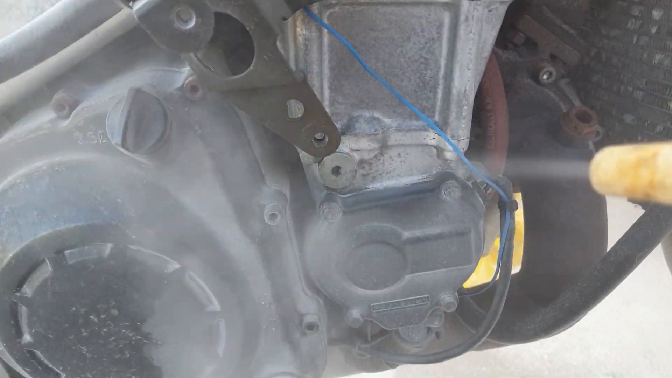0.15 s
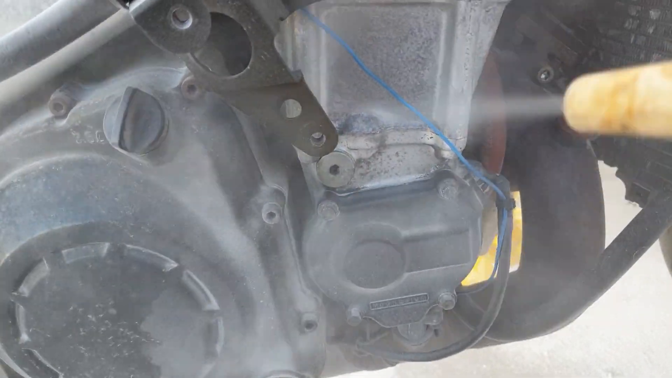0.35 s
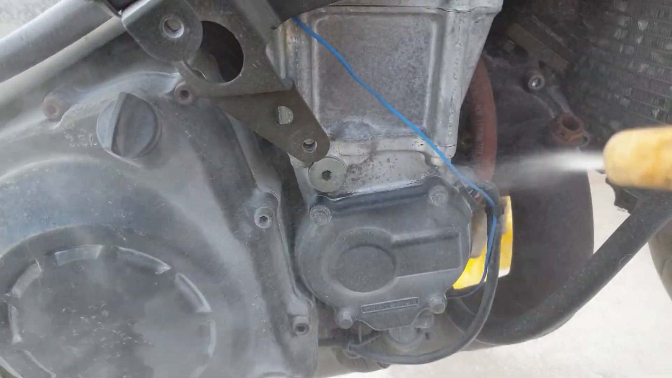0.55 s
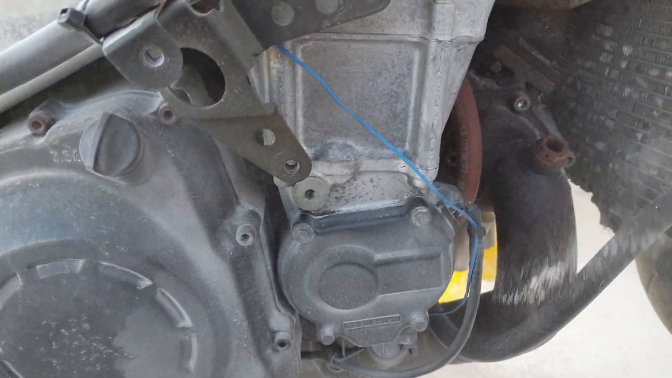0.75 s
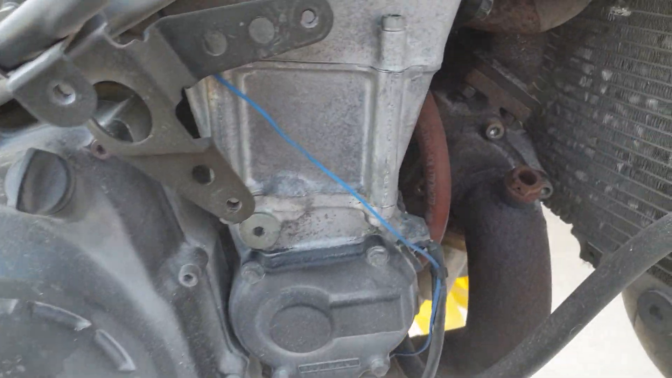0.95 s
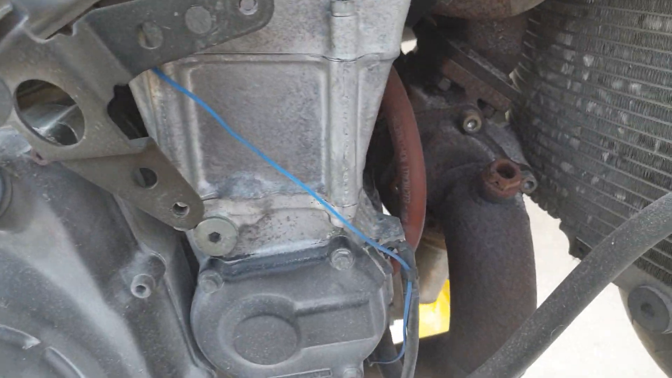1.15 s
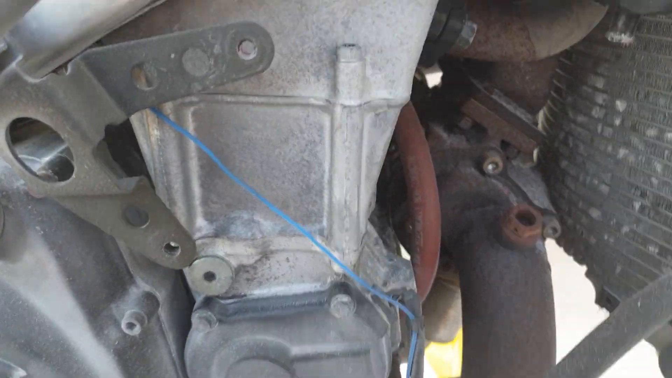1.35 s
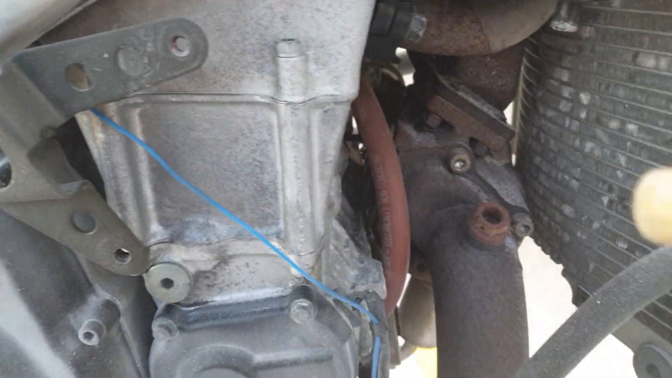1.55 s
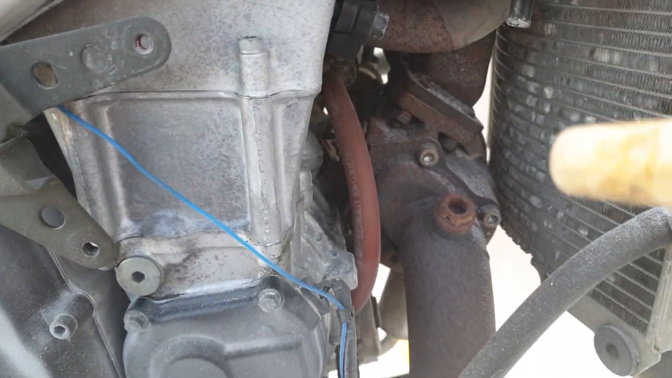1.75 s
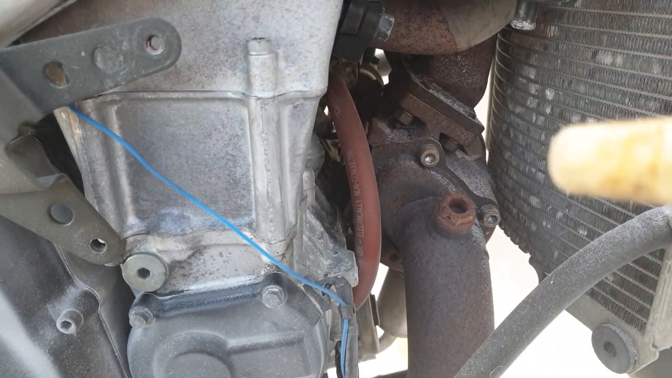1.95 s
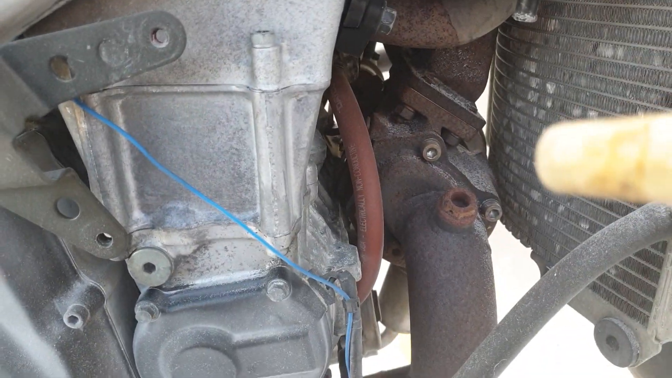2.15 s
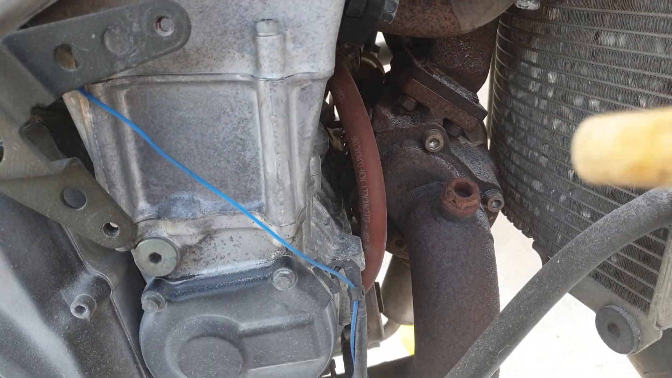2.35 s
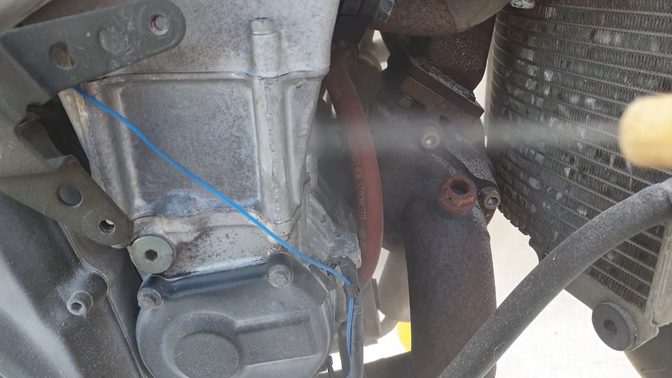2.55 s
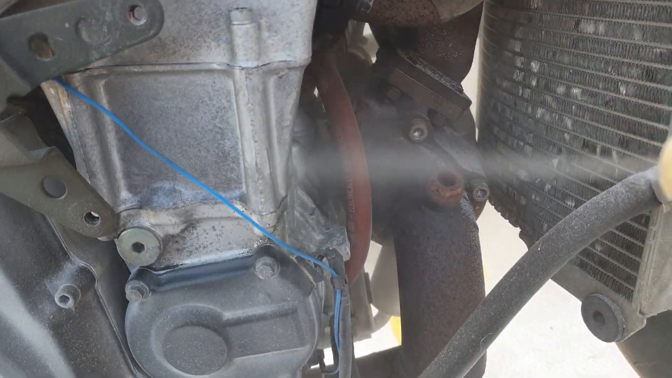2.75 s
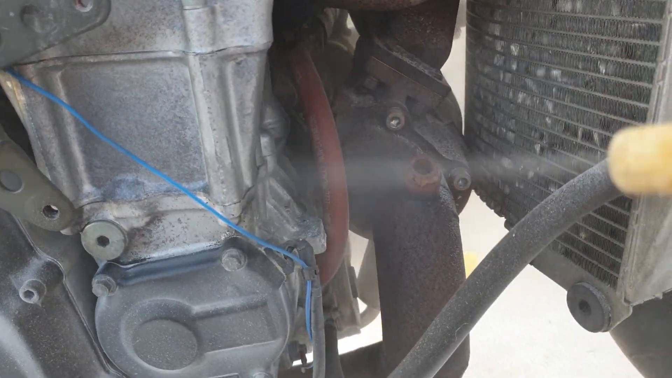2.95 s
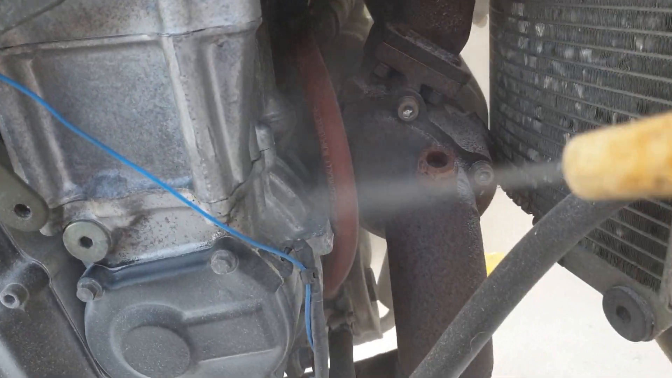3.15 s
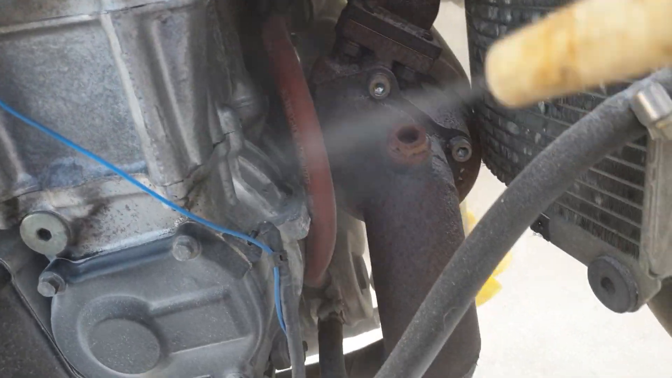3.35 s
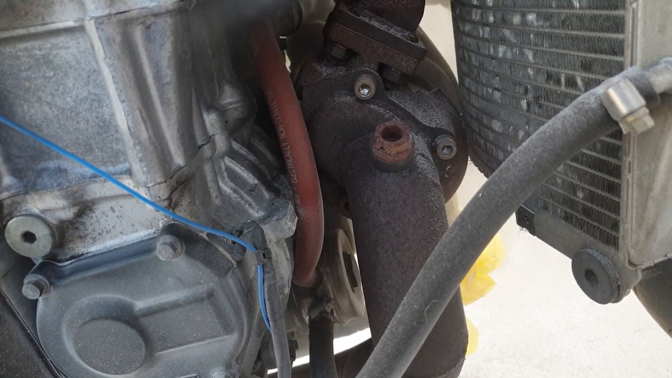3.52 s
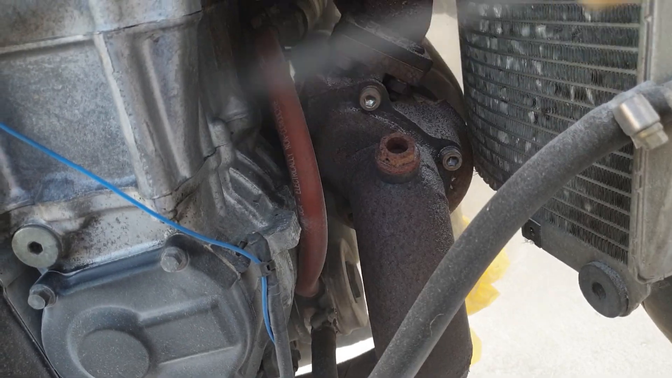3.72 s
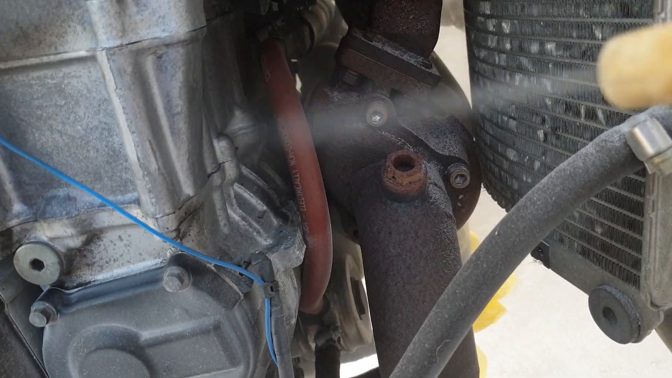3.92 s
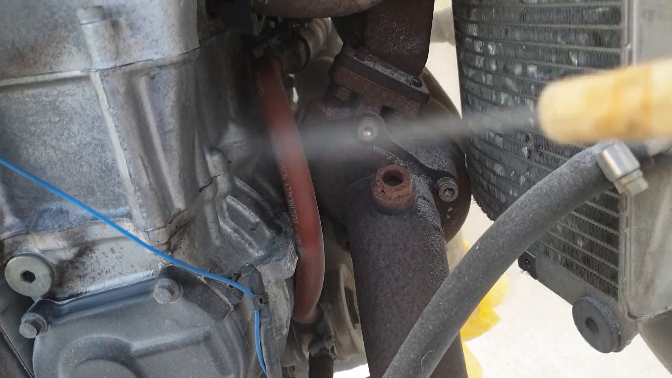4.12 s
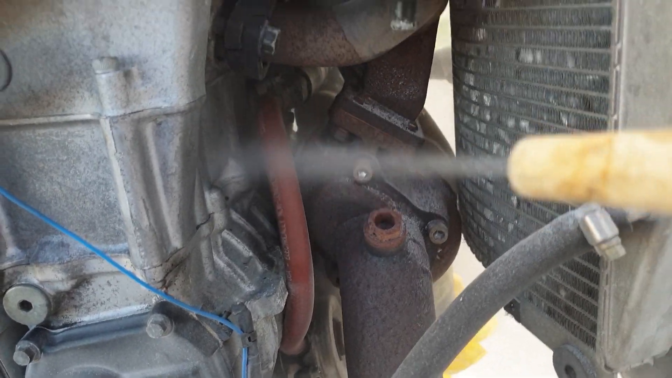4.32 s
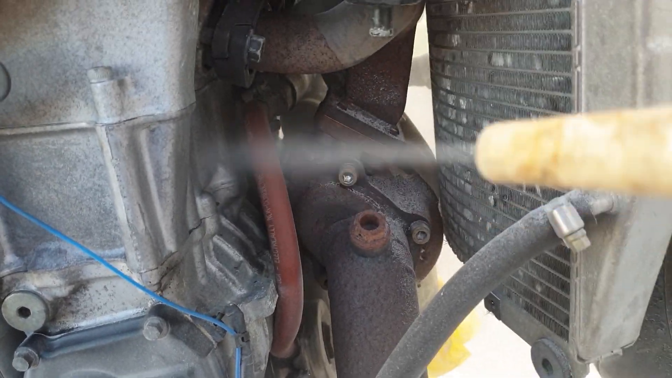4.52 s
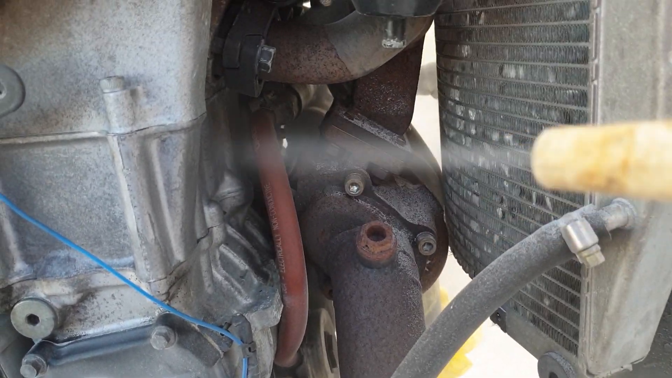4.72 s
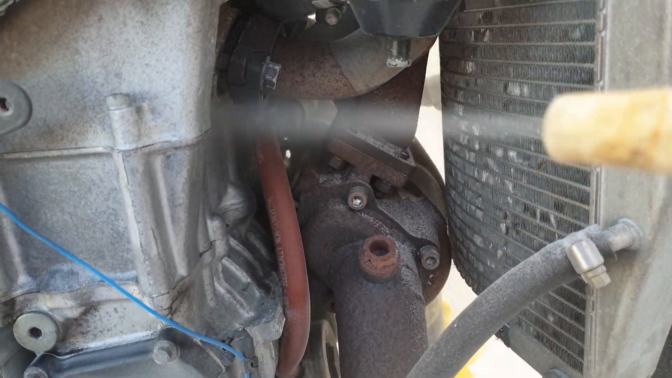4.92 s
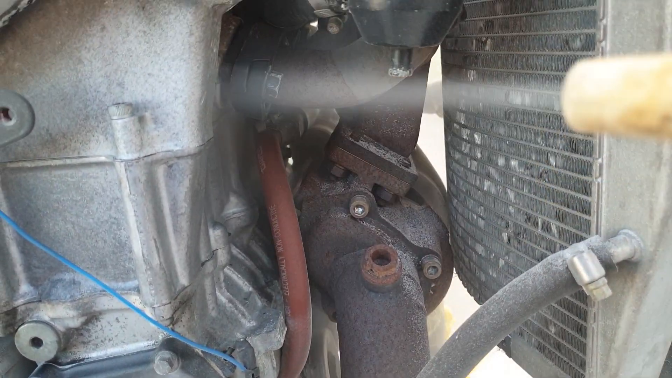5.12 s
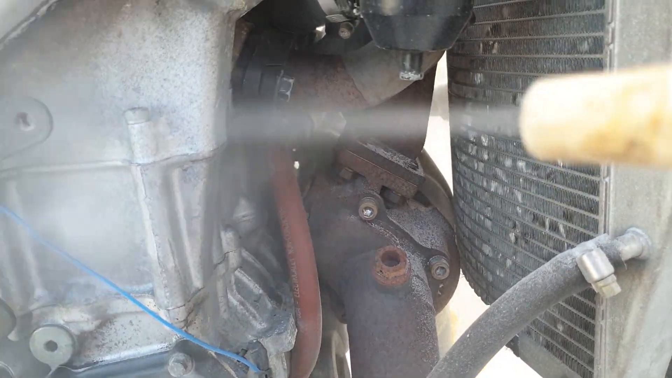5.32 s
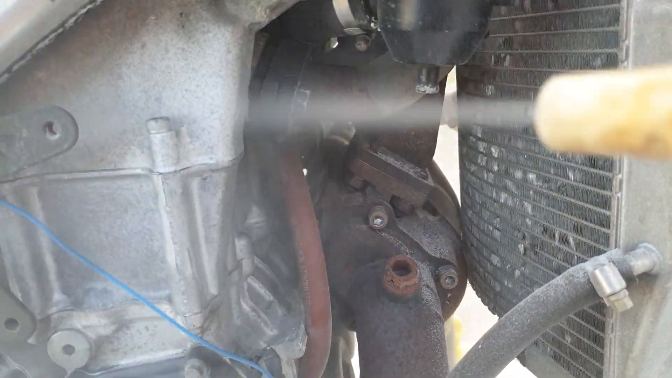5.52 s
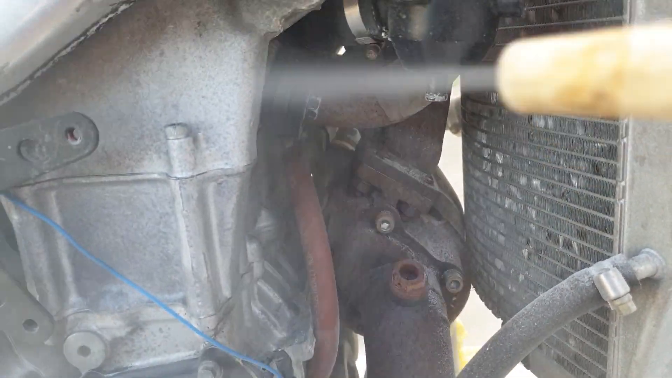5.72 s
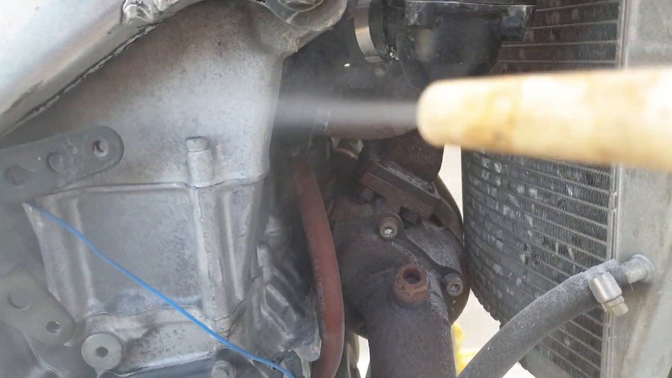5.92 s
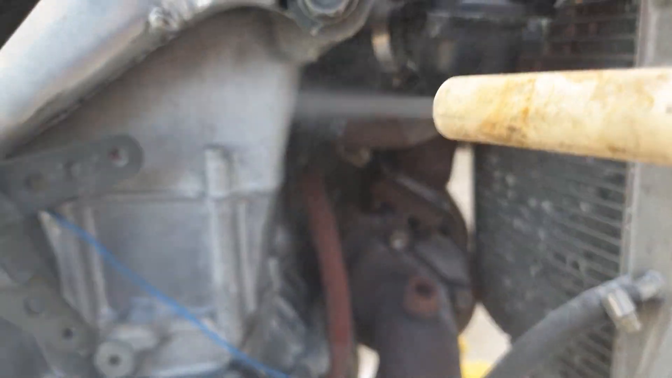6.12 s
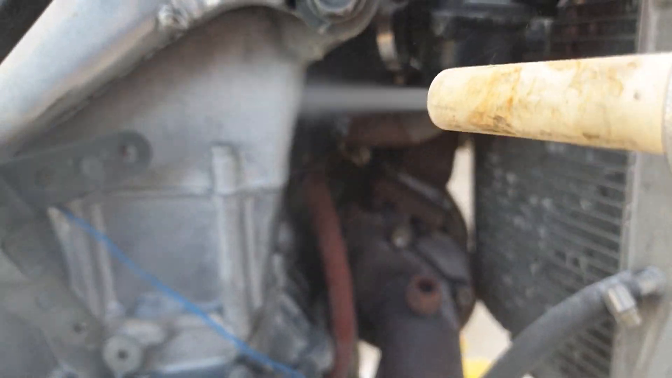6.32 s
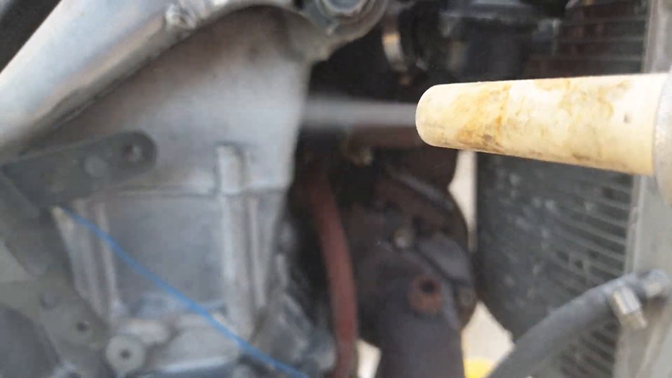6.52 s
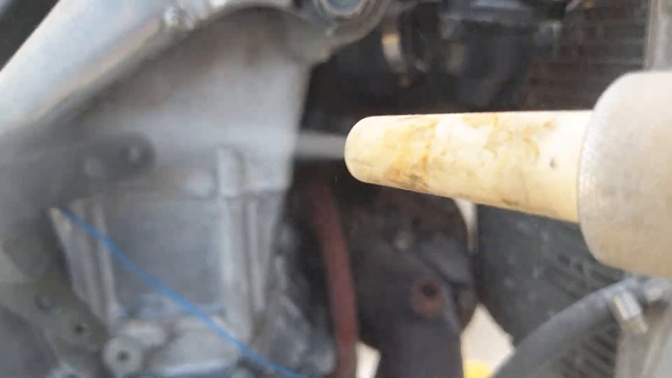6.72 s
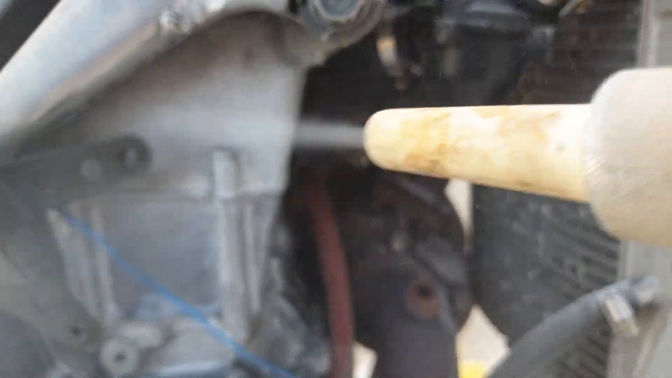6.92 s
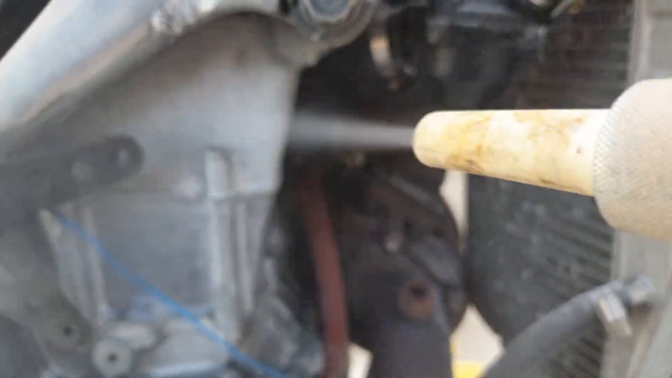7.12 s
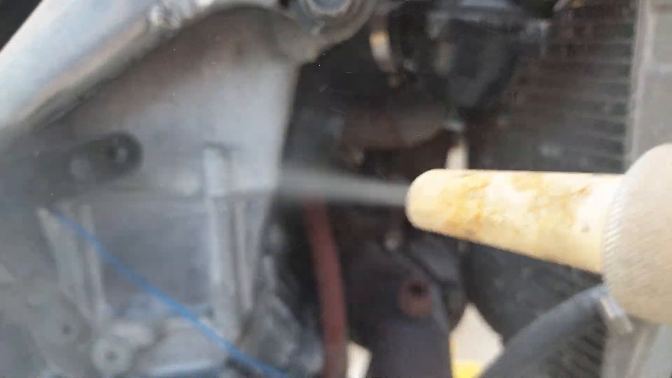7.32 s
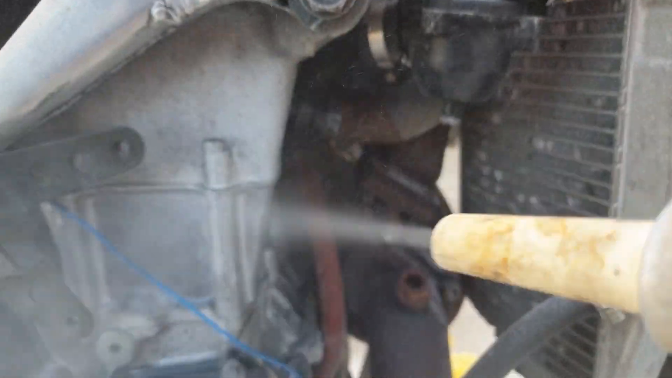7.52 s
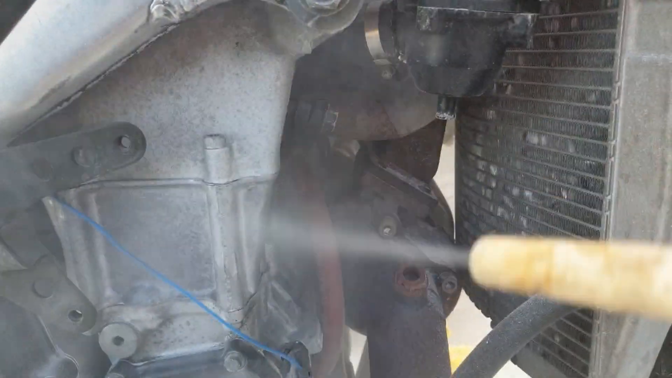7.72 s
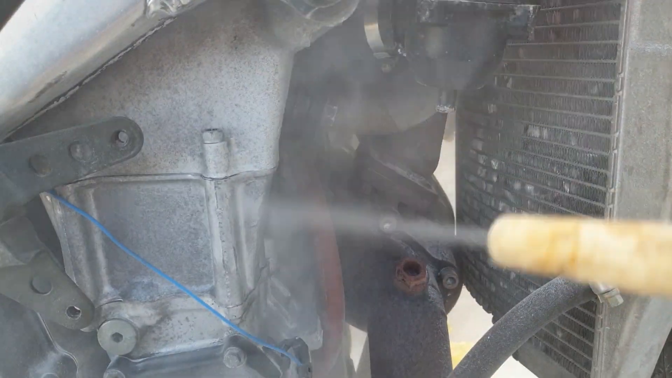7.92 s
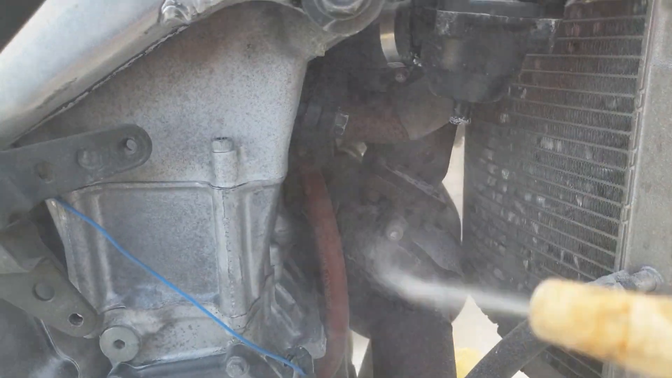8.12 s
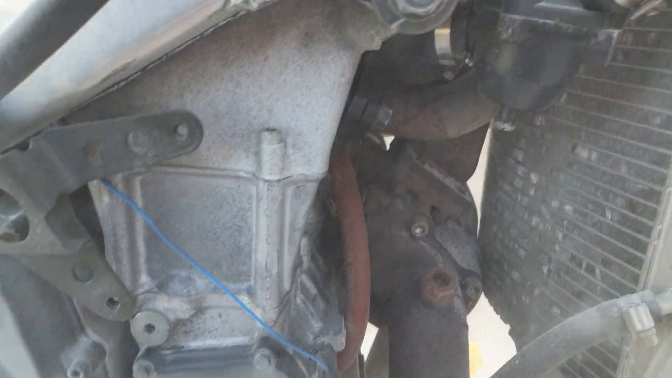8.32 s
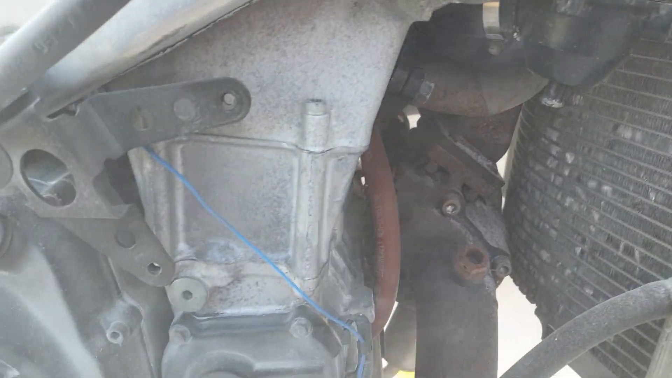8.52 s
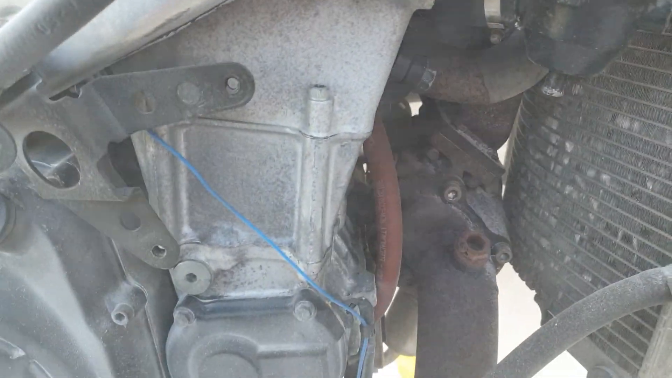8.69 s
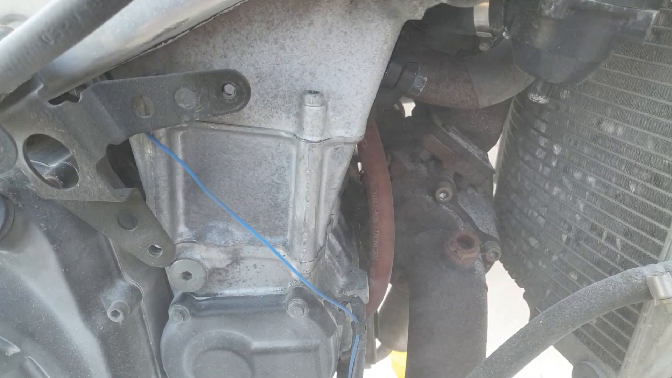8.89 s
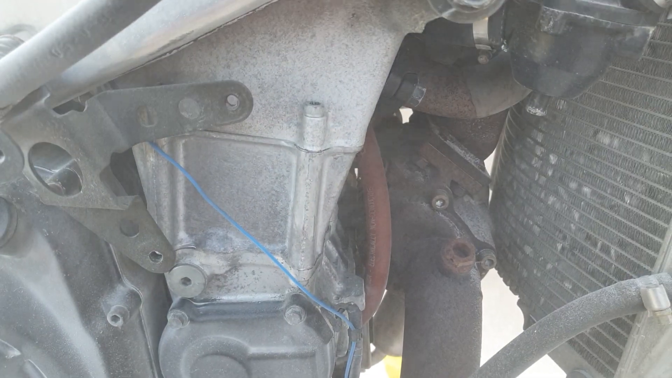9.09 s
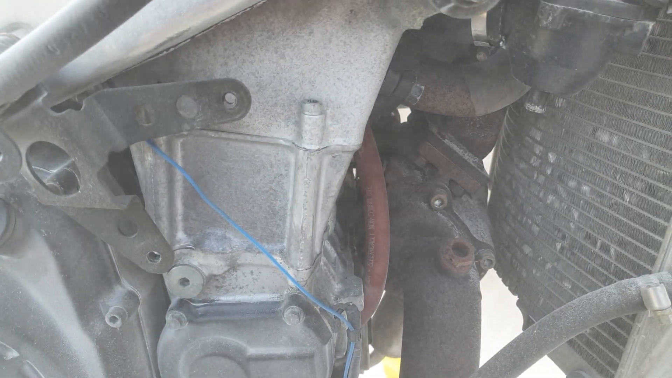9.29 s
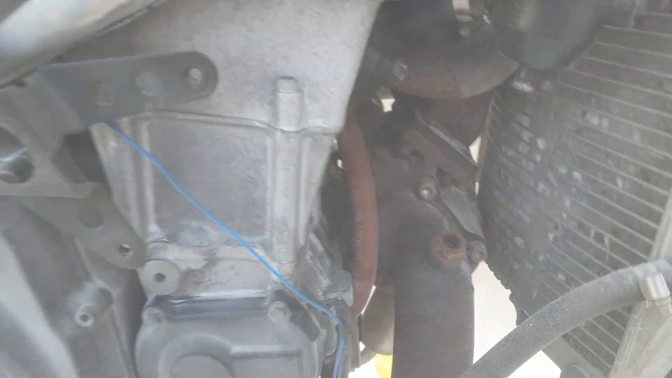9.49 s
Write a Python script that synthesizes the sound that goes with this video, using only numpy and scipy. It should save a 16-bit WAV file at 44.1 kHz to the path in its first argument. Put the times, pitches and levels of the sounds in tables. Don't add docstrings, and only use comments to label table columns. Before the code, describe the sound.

Close stereo microphone, dry open yard. A bright hissing stream of air and powder strikes metal and stops dead. Quiet follows, with a low distant rumble slowly rising. The jet bursts back with a low push and an initial surge, then runs continuously, its tone shifting between airy hiss, coarse rasp and hollow roar as it crosses castings. It snaps off, a little air seeps out, and a far air machine whirs up over the rumble.

```python
import sys
import numpy as np
from scipy import signal
from scipy.io import wavfile
from scipy.ndimage import uniform_filter1d

SR = 44100
rng = np.random.default_rng(int(sys.argv[2]) if len(sys.argv) > 2 else 0)


def level_to_linear(level):
    exponent = np.asarray(level, float) / 20
    return 10 ** exponent


def bounce(signal):
    frames = np.transpose(np.atleast_2d(signal))
    limited = np.clip(frames, -1, 1)
    pcm = np.round(limited * 32767).astype(np.int16)
    wavfile.write(sys.argv[1], SR, pcm)


N = 421155

SIZE, HOP = 512, 128
HZ = np.fft.rfftfreq(SIZE, 1 / SR)[:, None]
FINE_HZ = np.fft.rfftfreq(4 * SIZE, 1 / SR)[:, None]
T = np.arange(N // HOP + 6) * HOP / SR

# low_hz, high_hz
JET_BANDS = [(300, 1300), (1500, 4000), (4800, 7600), (9000, 15500)]
# roar_db, rasp_db, ring_db, hiss_db
JET_LEVELS = [(-37.5, -35.5, -32, -22.5), (-33, -36.5, -33, -21.5), (-39.5, -37.5, -32, -23),
              (-37.5, -34, -29, -21), (-34, -33.5, -32.5, -21.5)]
# roar_db, rasp_db, ring_db, hiss_db
SURGE = (6.8, 4.8, 6.8, 6.1)
SURGE_S = 0.18
# roar_db, rasp_db, ring_db, hiss_db
HAND_SHAKE = (1.2, 0.9, 0.51, 0.65)
# time_s, position_number
SWEEP = [(.6, 0), (2.5, 1), (3.2, 1.6), (3.6, 2), (5.1, 2), (5.7, 3), (7.2, 3), (7.7, 4)]
# freq_hz, density_db (per Hz)
JET_COLOUR = [
    [(200, -20), (564, -10), (742, -12.5), (827, -10), (1740, -9), (2960, -16), (4000, -14), (5590, -11.5),
     (7220, -5), (11400, -0.5), (15500, -2)],
    [(200, -24.5), (430, -7), (665, -11.5), (874, -1), (1050, -10), (1840, -5), (4330, -15), (6130, -7),
     (8350, -11.5), (15000, -3.5)],
    [(200, -12), (358, -14.5), (497, -6.5), (653, -11), (974, -9), (4100, -12.5), (6960, -5.5), (8500, -8),
     (10800, -2), (12700, -4.5), (15500, 1)],
    [(200, -9.5), (446, -4), (858, -8), (1710, -10.5), (3070, -17.5), (5010, -8.5), (6020, -1.5),
     (8200, -10.5), (13200, -8.5), (15500, -4.5)],
    [(200, -11.5), (352, -15.5), (454, -7), (812, -4), (1280, -8), (1650, -5), (2960, -9.5), (4410, -10.5),
     (6470, -5), (7900, -8.5), (10800, -5), (15500, 0)],
]
# freq_hz, left_minus_right_db
JET_LEAN = [
    [(60, -13), (99, -15), (160, -15), (270, -11.5), (450, -7.5), (740, -1), (1220, -1), (2010, 0.5),
     (3330, -2.5), (5500, 4), (9080, -12.5), (15000, -1.5)],
    [(60, -11), (99, -3.5), (160, 1), (270, 0.5), (450, -1), (740, -2.5), (1220, 3.5), (2010, 2),
     (3330, -5), (5500, 2), (9080, -3.5), (15000, 1.0)],
    [(60, 7.5), (99, -0.5), (160, 13), (270, 3), (450, -1.5), (740, -1), (1220, 1), (2010, 2.5),
     (3330, -6.5), (5500, 4), (9080, -7), (15000, -3)],
    [(60, 4), (99, 5), (160, -4.5), (270, 1), (450, -1), (740, 2.5), (1220, 2), (2010, 7), (3330, -4.5),
     (5500, 11.5), (9080, -3.5), (15000, 2)],
    [(60, 0), (99, -3.5), (160, 7), (270, 2), (450, 1.5), (740, 0.5), (1220, 3.5), (2010, 5.5), (3330, -3),
     (5500, 4), (9080, -4.5), (15000, 3.5)],
]
# freq_hz, left_lead_rad
PORT_LEAD = [
    [(800, -.1), (2800, -2.8), (5000, -2.9), (8600, -5.1), (15000, -8.8)],
    [(900, .2), (2000, -.8), (2800, -3.1), (7000, -3.6), (15000, -7.3)],
    [(900, .1), (2000, -.7), (2800, -3.2), (5000, -5.6), (6500, -4)],
    [(400, .2), (1200, 1.1), (2800, .8), (4000, -1.1), (9000, -2.2)],
    [(400, .1), (1500, .9), (2300, -.1), (3300, -1), (6000, -2.4)],
]
# freq_hz, cut_db
JET_BASS = [(120, -35.5), (200, -3)]
# start_s, end_s, low_hz, high_hz, lift_db (negative dips)
POCKETS = [(0.063, 0.14, 1400, 2600, 7.5), (0.056, .17, 3500, 17000, 2.5), (-.1, .3, 3600, 5000, 5),
           (3.196, 3.5, 1300, 3500, 4), (3.24, 3.42, 450, 1000, 3), (3.248, 3.5, 5000, 8000, 2.5),
           (4.6, 5.08, 1190, 4500, -2), (3.51, 3.797, 450, 1110, 3), (5.264, 5.7, 350, 1390, 4.5),
           (5.323, 5.44, 420, 1250, 5), (5.306, 5.597, 1520, 1990, 12), (5.7, 6.05, 10000, 15000, 0),
           (5.902, 6.65, 5600, 6400, 2), (7.251, 7.6, 7000, 10500, 1.5), (6.307, 6.373, 1610, 3500, 3),
           (6.51, 6.583, 1600, 3200, 6), (6.69, 6.873, 1490, 3800, 8), (6.7, 6.87, 2300, 3200, 4),
           (7.045, 7.16, 1520, 2980, 10), (7.467, 7.533, 400, 2200, 4), (7.618, 7.78, 1410, 1900, 8),
           (7.67, 7.914, 400, 1200, 4), (8.031, 8.11, 700, 2500, 3.5), (.2, .4, 5200, 6500, -2),
           (.4, .55, 7500, 9200, 1.5), (.18, .4, 8000, 9500, -2), (2.85, 3.1, 4200, 5600, -2),
           (3.3, 3.6, 8200, 9600, 3), (3.75, 4.3, 7200, 8600, 2), (4.55, 5.15, 5500, 6600, -3),
           (5.35, 6.0, 4300, 5700, -2.5), (5.5, 5.85, 7000, 8000, 2), (5.85, 6.1, 11000, 12500, 2.5),
           (6.5, 6.9, 12500, 13800, 1.5), (7.03, 7.15, 10500, 13500, 2), (6.3, 7.3, 4300, 5300, 1.5),
           (7.6, 8.2, 5000, 7000, 2), (7.5, 7.95, 9500, 11000, 2), (7.6, 8.2, 12000, 14000, -2),
           (5.8, 6.1, 850, 1350, -2)]
# center_hz, width_hz, change_db
HOUSING = [(3010, 80, -4), (4430, 80, -6), (8300, 200, -3)]
# center_hz, width_hz, lean_db
PORT_SHADOW = [(3900, 800, -5.5), (8200, 900, -6.5), (1900, 500, 1.5)]
# freq_hz, likeness (0-1)
JET_ALIKE = [(200, .62), (500, .85), (1200, .68), (2000, .5), (4000, .56), (8000, .56), (16000, .48)]
# freq_hz, drift_rad
PORT_WANDER = [(600, .1), (1500, .5), (3000, 1.), (16000, 1.5)]

# open_s, shut_s, bleed_db_per_s, leak_db, leak_fade_db_per_s, leak_length_s
TRIGGER = [
    (-.1, 0.582, 2900, -65.5, 108, 0.18),
    (2.578, 8.149, 2900, -64.5, 75, .18),
]
# freq_hz, density_db (per Hz)
LEAK_COLOUR = [(300, -12), (1000, -1), (3000, -3), (6500, -1.5), (11000, -2.5), (16000, -6)]
# level_db, pitch_hz, t60_s
THUMP = (-26.5, 92, 0.07)
THUMP_S = 2.576

BUFFET_DB = -55
# freq_hz, density_db (per Hz)
BUFFET_COLOUR = [(20, -40.5), (35, -17.5), (60, -2), (260, -4), (340, -28), (570, -120)]
# freq_hz, likeness (0-1)
BUFFET_ALIKE = [(30, .35), (100, .5), (250, .6)]
# center_s, half_length_s, lift_db
GUSTS = [(.05, .05, 7.5), (4.88, .04, 9), (5.8, 0.22, 8.5), (5.92, .05, 2), (7.3, .05, 3), (7.5, .05, 4.5),
         (8.13, .05, 2)]

# freq_hz, t60_s
ECHO_DECAY = [(200, .1), (1000, 0.11), (4000, 0.11), (16000, 0.125)]
# freq_hz, level_db
ECHO_COLOUR = [(500, -21), (3000, -15), (12000, -21)]

# time_s, swell (0 low, 1 full)
YARD_SWELL = [(1.1, 0.01), (1.55, 0), (1.8, 0.22), (2.0, 0.63), (2.3, 0.97), (8.2, 0.9), (8.41, 0.82),
              (8.49, 0.99), (9.3, 1), (9.55, 1.1)]
# rumble_db, wash_db, hiss_db
YARD_LOW = (-70.5, -83, -101)
# rumble_db, wash_db, hiss_db
YARD_FULL = (-57, -69.5, -90.5)
# freq_hz, density_db (per Hz)
RUMBLE_COLOUR = [(12, -52), (20, -23.5), (40, -8.5), (75, 3.5), (113, -4.5), (144, -5), (268, -23),
                 (300, -16), (390, -46), (660, -120)]
# freq_hz, density_db (per Hz)
WASH_COLOUR = [(120, -31), (200, -5.5), (269, -9), (308, -9), (347, -14.5), (549, -12), (637, -13.5),
               (1060, -15), (1270, -24.5), (1470, -24), (2230, -29), (2960, -44), (5000, -50.5),
               (6500, -84.5), (11000, -120)]
# freq_hz, density_db (per Hz)
HISS_COLOUR = [(2500, -25), (4500, -17), (6250, -12), (7900, -18), (8800, -12), (11200, -14.5),
               (15500, -14.5)]
# level_db, fade_db_per_s
DREGS = (-80.5, 60)
# pitch_hz, level_db
MOTOR_HUM = [(86, -73), (146, -72)]
# freq_hz, likeness
YARD_ALIKE = [(60, .75), (250, .85), (520, .5), (860, -.2), (1200, -.45), (1700, -.3), (2240, .45),
              (2800, -.2), (4000, 0)]
# freq_hz, left_minus_right_db
YARD_LEAN = [(60, -2), (110, -1), (200, -3), (380, -1.5), (700, -4), (1290, 1), (2100, 6), (3100, 0),
             (4200, -7), (5200, 2), (6800, 4), (8500, -7), (10500, -8), (13500, 0), (15500, -3)]

# start_s, spin_up_s
WHIR_START = (8.43, .06)
WHIR_DB, WHIR_GROWTH_DB_S = -74, 4.5
# freq_hz, density_db (per Hz)
WHIR_COLOUR = [(280, -30), (400, 4), (900, -4.5), (1300, -12), (1620, -8), (1720, 3), (1900, -2),
               (2350, -4.5), (2800, -11), (3130, -17), (3620, -11), (4000, -18), (4400, -21), (6200, -26),
               (6600, -15), (7400, -16), (7700, -27), (9500, -50)]
# pitch_hz, level_db
WHIR_TONES = [(398, -80), (592, -76.5), (759, -78.5), (813, -80.5), (845, -77.5), (1055, -83),
              (1690, -83.5), (1782, -86)]
# start_s, end_s, level_db
HOSE_VENT = (8.45, 8.89, -90)


def jet():
    colour_db = by_position(JET_COLOUR) + read(JET_BASS) + bumps(HOUSING)
    lift_db = [want - band_db(colour_db, *band) for want, band in zip(jet_levels(), JET_BANDS)]
    centres = [np.sqrt(lo * hi) for lo, hi in JET_BANDS]
    for k, lift in enumerate(lift_db):
        only_this_band = list(zip(centres, np.eye(len(JET_BANDS))[k]))
        colour_db = colour_db + lift * read(only_this_band)
    comb_db = 1.4 * np.tanh(HZ / 1800) * patches(2, 50)
    patchy_db = 0.49 * patches(5, 12) + 0.3 * patches(40, 2)
    colour_db = colour_db + pockets() + comb_db + patchy_db - .4

    lean_db = by_position(JET_LEAN) + bumps(PORT_SHADOW) + 3.6 * np.tanh(HZ / 1500) * patches(2, 35)
    lead = by_position(PORT_LEAD, lambda v: np.exp(1j * v))
    turn = np.exp(1j * (np.angle(lead) + read(PORT_WANDER) * patches(3, 20)))
    usual = np.cos(np.angle(lead)) * np.exp(-read(PORT_WANDER) ** 2 / 2)
    alike = np.clip(read(JET_ALIKE) + 0.15 * patches(4, 15), 0, .97)
    flutter = evened(signal.lfilter([1], [1, -.96], rng.standard_normal(N)))
    return ports(colour_db, lean_db, alike, turn, usual) * level_to_linear(0.68 * flutter)


def jet_levels():
    since = np.maximum(T - TRIGGER[1][0], 0)
    surge = np.exp(-(since / SURGE_S) ** 1.6) * (T > TRIGGER[0][1] + 1)
    shake = uniform_filter1d(uniform_filter1d(rng.standard_normal((len(T), 4)), 18, 0), 18, 0).T
    held = blend(np.array(JET_LEVELS)[:, :, None])
    return held + np.outer(SURGE, surge) + np.c_[list(HAND_SHAKE)] * evened(shake)


def pockets():
    lift_db = 0
    for start, end, lo, hi, db in POCKETS:
        edge_hz = np.minimum(.18 * lo, 350)
        lift_db = lift_db + db * window(T, start, end, 0.024) * window(HZ, lo, hi, edge_hz)
    return lift_db


def valve(rise_db_s=2300):
    t, flow, leak = np.arange(N) / SR, 0, 0
    for on, off, fall_db_s, leak_db, fade_db_s, length in TRIGGER:
        early = np.clip(on - .008 - t, 0, 1)
        rise_db = np.minimum(rise_db_s * (t - on), 0) * (1 + 900 * early)
        since = np.maximum(t - off, 0)
        flow = flow + level_to_linear(rise_db.clip(-200) - (fall_db_s * since).clip(0, 200))
        leak = leak + (t > on) * level_to_linear(leak_db - fade_db_s * since) * window(since, -1, length, 0.0253)
    return flow, leak


def seep():
    power = layer(LEAK_COLOUR, T, 0 * T, 300, 16000)
    return background(power, .8, [(500, .6), (4000, .2)], [(500, -1), (9000, -1)])


def thump():
    db, hz, t60 = THUMP
    t = np.maximum(np.arange(N) / SR - THUMP_S, 0)
    return level_to_linear(db - 60 * t / t60) * np.sin(2 * np.pi * hz * t)


def buffet():
    level_db = BUFFET_DB + sum(db * np.exp(-((T - s) / half) ** 2) for s, half, db in GUSTS)
    power = layer(BUFFET_COLOUR, T, level_db, 40, 220)
    return background(power, 1.5, BUFFET_ALIKE, [(40, 0.023), (200, 0.01)])


def room(x):
    hz, t, z = signal.stft(rng.standard_normal((2, SR // 4)), SR, nperseg=256)
    t60 = read(ECHO_DECAY, hz)[:, None]
    decay_db = read(ECHO_COLOUR, hz)[:, None] - 60 * t / t60
    tail = signal.istft(z * level_to_linear(decay_db), SR, nperseg=256)[1]
    return signal.oaconvolve(x, tail / np.sqrt(.008 * SR), axes=1)[:, :N]


def yard():
    swell = np.interp(T, *np.transpose(YARD_SWELL))
    lateness = (1.1, .8, 3)
    levels = [a + (b - a) * swell ** late for a, b, late in zip(YARD_LOW, YARD_FULL, lateness)]
    rumble_db, wash_db, hiss_db = levels
    dregs = sum(level_to_linear(DREGS[0] - DREGS[1] * abs(T - row[1])) ** 2 for row in TRIGGER)
    vent = level_to_linear(HOSE_VENT[2]) ** 2 * window(T, *HOSE_VENT[:2], .03)
    hiss_db = 10 * np.log10(level_to_linear(hiss_db) ** 2 + dregs + vent)
    whir_power, whir_tones = far_machine()
    power = layer(RUMBLE_COLOUR, T, rumble_db, 40, 200) + layer(WASH_COLOUR, T, wash_db, 300, 1500)
    power = power + layer(HISS_COLOUR, T, hiss_db, 9800, 14000) + whir_power
    hum = tones(MOTOR_HUM, T, np.minimum(rumble_db + 68.5, 3.5), .6)
    return background(power, 1.5, YARD_ALIKE, YARD_LEAN) + hum + whir_tones


def far_machine():
    start, spin_up = WHIR_START
    speed_db = 20 * np.log10(np.clip((T - start) / spin_up, .005, 1))
    whir_db = WHIR_DB + WHIR_GROWTH_DB_S * (T - start) + speed_db
    return layer(WHIR_COLOUR, T, whir_db - 2.0, 1500, 8000), tones(WHIR_TONES, T, whir_db + 74, 1.1)


def tones(lines, s, db, spread):
    t, total = np.arange(N) / SR, 0

    def waver():
        slow = uniform_filter1d(uniform_filter1d(rng.standard_normal(len(T)), 45), 45)
        return np.interp(t, T, evened(slow))

    for hz, level in lines:
        total = total + level_to_linear(level + 1.8 * waver()) * np.sin(2 * np.pi * hz * t + spread * waver())
    return total * level_to_linear(np.interp(t, s, db))


def background(power, patchy_db, alike, lean):
    drift = uniform_filter1d(uniform_filter1d(rng.standard_normal(power.shape[::-1]), 8, 0), 12, 1)
    field_db = 10 * np.log10(power + 1e-20) + patchy_db * evened(drift.T)
    return ports(field_db, read(lean, FINE_HZ), np.clip(read(alike, FINE_HZ), -.98, .98))


def layer(colour, s, db, lo, hi):
    power = level_to_linear(read(colour, FINE_HZ)) ** 2
    in_band = (power * ((FINE_HZ >= lo) & (FINE_HZ < hi))).mean()
    return power / in_band * level_to_linear(np.interp(T[::4], s, db)) ** 2


def ports(field_db, lean_db, alike, turn=0.91, usual=0.87):
    a, b, c, d = rng.standard_normal((field_db.shape[1], field_db.shape[0], 4), dtype=np.float32).T
    shared, separate = a + 1j * b, c + 1j * d
    left, right = level_to_linear(lean_db / 2), level_to_linear(-lean_db / 2)
    gain = level_to_linear(field_db) / np.sqrt(left ** 2 + right ** 2 + 2 * left * right * alike * usual) * 2
    other = alike * np.conj(turn) * shared + np.sqrt(1 - alike ** 2) * separate
    size = 2 * len(field_db) - 2
    z = np.array([gain * left * shared, gain * right * other])
    return signal.istft(z, nperseg=size, noverlap=size - size // 4)[1][:, :N] * np.sqrt(3 / size)


def by_position(tables, shape=lambda v: v):
    return blend([shape(read(table)) for table in tables])


def blend(values):
    place = np.clip(np.interp(T, *np.transpose(SWEEP)), 0, len(values) - 1)
    return sum(v * np.maximum(1 - abs(place - k), 0) for k, v in enumerate(values))


def patches(bins, frames):
    field = rng.standard_normal((len(T) // 2 + 1, len(HZ)))
    for _ in range(2):
        field = uniform_filter1d(uniform_filter1d(field, frames, 0), bins, 1)
    return evened(np.repeat(field, 2, axis=0)[:len(T)].T)


def band_db(field_db, lo, hi):
    inside = (HZ >= lo) & (HZ < hi)
    return 10 * np.log10((level_to_linear(field_db) ** 2 * inside).sum(0) / len(HZ))


def bumps(rows):
    return sum(db * np.exp(-((HZ - hz) / width) ** 2) for hz, width, db in rows)


def window(x, a, b, soft):
    return (np.tanh((x - a) / soft) - np.tanh((x - b) / soft)) / 2


def read(points, hz=HZ):
    f, value = np.transpose(points)
    return np.interp(np.log(hz + 1), np.log(f + 1), value)


def evened(x):
    return x / np.sqrt(np.mean(x ** 2) + 1e-20)


def scene():
    flow, leak = valve()
    blast = (jet() + buffet()) * flow
    return blast + room(blast) + thump() + yard() + seep() * leak


def top_cut(x):
    return signal.sosfilt(signal.butter(12, 16400, fs=SR, output="sos"), x)


def record(dry):
    thin = signal.sosfilt(signal.butter(2, 38, "high", fs=SR, output="sos"), dry)
    capped = 1.2 * np.tanh(thin / 1.2)
    band_limit = signal.firwin(2001, 15760, window=("kaiser", 6), fs=SR)
    mix = signal.oaconvolve(capped, band_limit[None], "same")
    return top_cut(mix)


dry = scene()
out = record(dry)
bounce(out)
```